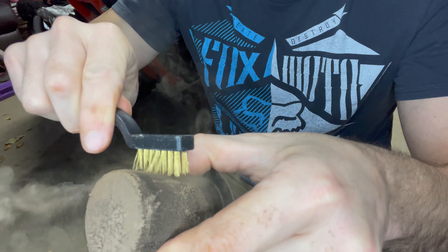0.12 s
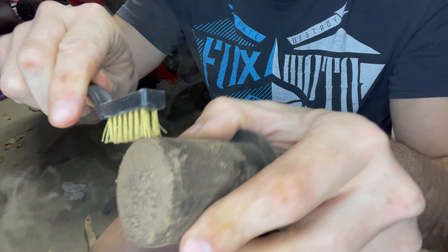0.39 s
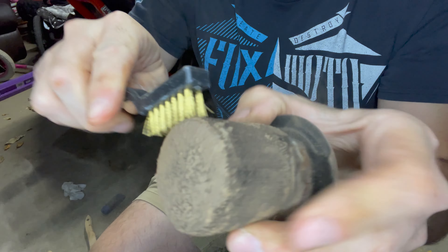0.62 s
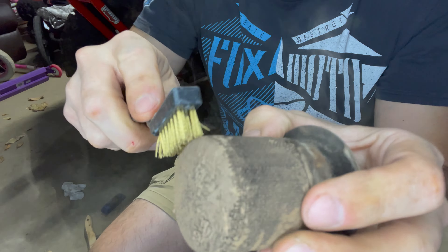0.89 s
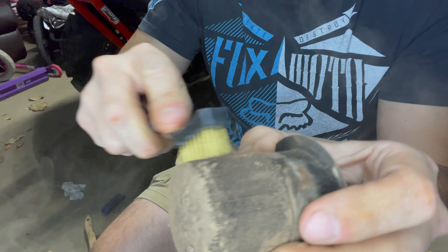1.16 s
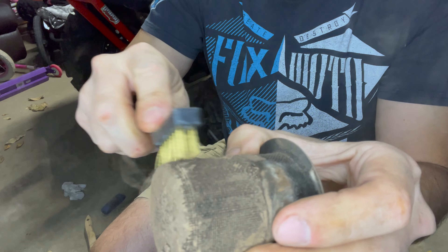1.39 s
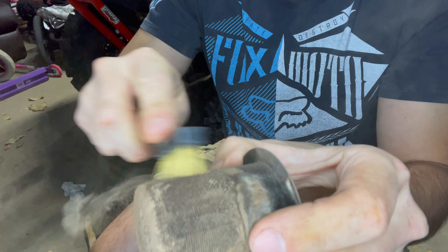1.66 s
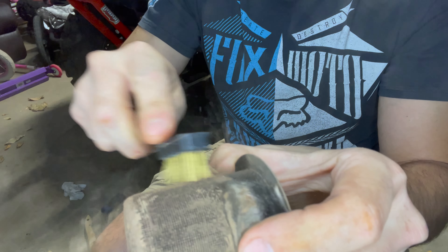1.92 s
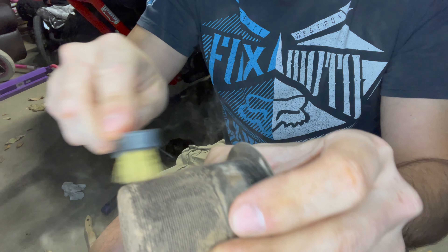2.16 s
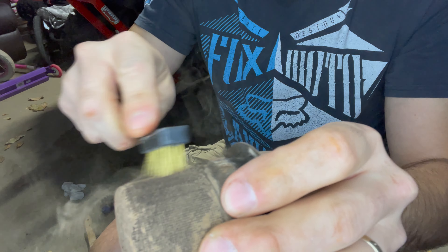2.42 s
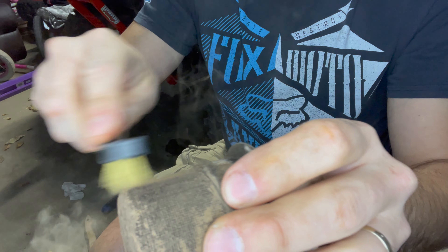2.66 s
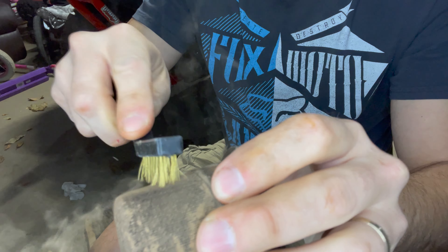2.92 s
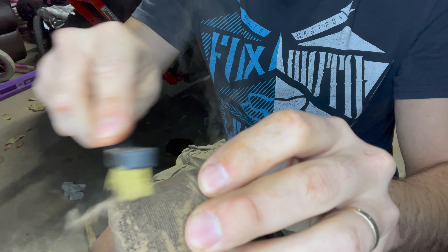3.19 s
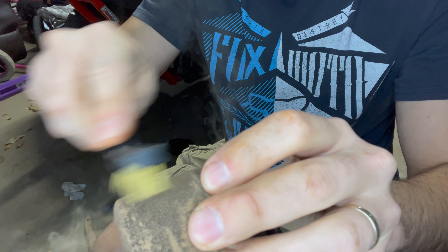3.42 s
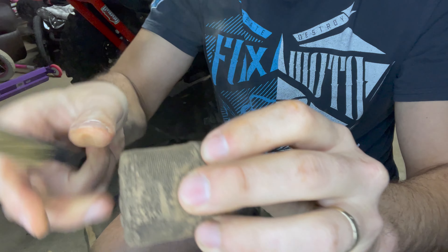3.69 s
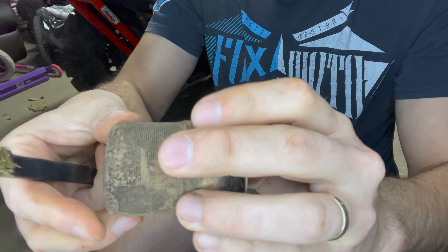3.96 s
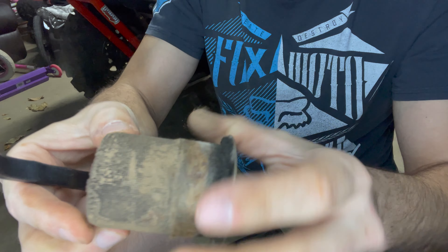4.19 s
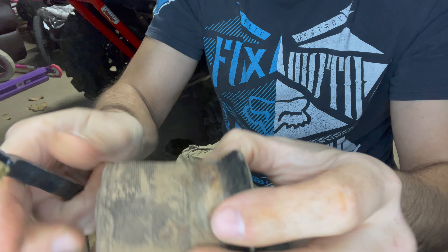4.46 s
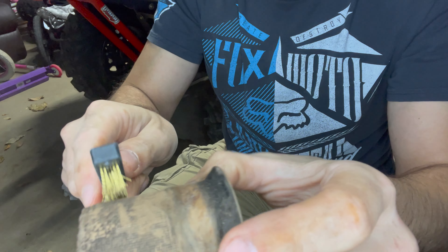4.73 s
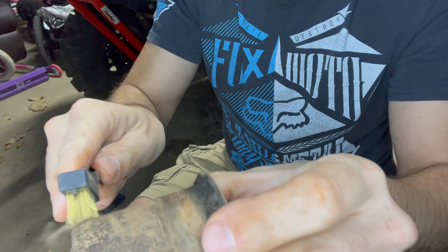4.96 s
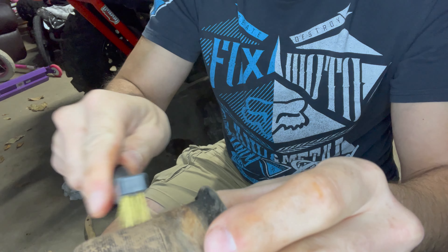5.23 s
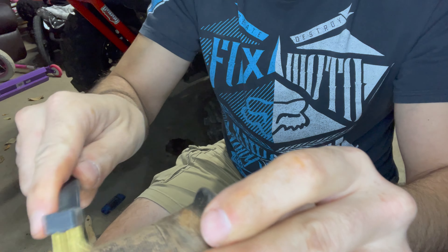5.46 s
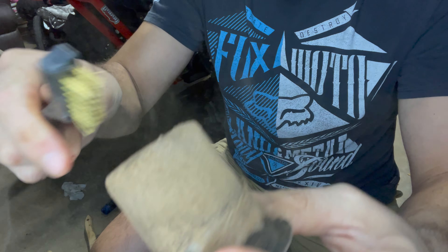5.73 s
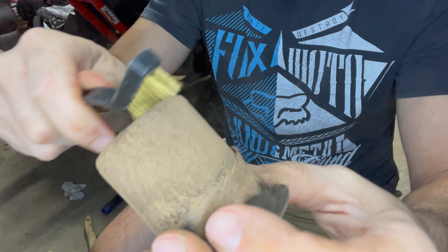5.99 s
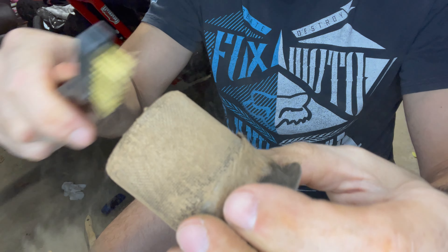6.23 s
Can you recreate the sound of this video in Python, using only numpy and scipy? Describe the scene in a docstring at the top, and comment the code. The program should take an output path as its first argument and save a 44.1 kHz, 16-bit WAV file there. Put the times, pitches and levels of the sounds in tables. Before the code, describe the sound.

Close, dry bristle scratching on a dirty metal cup comes in fast back-and-forth bursts, with quiet gritty turning between and a distant engine drone.

```python
"""Wire brush on a crusted mesh cup

A small wire brush scrubs a metal mesh cup back and forth, close to a two-port microphone in a garage.
Showers of random bristle slips make the scratch and ring the cup's modes; brief noise ticks sharpen it.
Between the bursts fingers turn the cup: soft rubs, slides and knocks, with grit cracking in tiny bursts.
A distant engine drones as a stack of sine orders, over low street rumble of coloured noise."""
import sys
import numpy as np
from scipy import signal
from scipy.fft import rfft, irfft
from scipy.io import wavfile
from scipy.ndimage import uniform_filter1d

SR = 44100
rng = np.random.default_rng(int(sys.argv[2]) if len(sys.argv) > 2 else 0)


def field_ratio(decibels):
    """Amplitude ratio for a level in dB (20 dB per decade); scalars and array-likes work."""
    return 10 ** (np.asarray(decibels, dtype=float) / 20)


def put_to_file(sound):
    """Save the sound as 16-bit audio at rate SR, in the file named by the first command-line argument."""
    columns = np.atleast_2d(sound).T  # one column per channel
    safe = np.clip(columns, -1, 1)
    whole_steps = np.round(safe * 32767)
    wavfile.write(sys.argv[1], SR, whole_steps.astype(np.int16))


N = 280715

# brush strokes; each time runs between full speed and 6 dB down; pressure is into the wall:
# full_speed_s, level_db, speed_up_ms, slow_down_ms, pressure_db
STROKES = [(0.036, -37.5, 24, 26, 0), (0.119, -35.5, 19.6, 18.6, 2.5), (0.197, -38, 19.5, 25, 1),
           (0.304, -40.5, 13, 2.8, -4), (1.08, -35.5, 6, 44, 3.5), (1.209, -40, 31, 32, 2.5),
           (1.32, -50.5, 42, 3.6, 4), (1.424, -39.5, 18.7, 58, 7), (1.585, -40, 35.6, 18, 8),
           (1.68, -36, 31.6, 31, 6), (1.805, -41, 49, 12, 7.5), (1.889, -36, 27, 30, 5.5),
           (2.004, -42.5, 45, 12.5, 9), (2.094, -36, 30, 20.5, 6.5), (2.2, -36, 38, 5.4, -11),
           (2.27, -36, 30.3, 23, 3), (2.359, -34, 31, 17.6, -14.5), (2.433, -34, 26, 24, -9),
           (2.518, -34.5, 21, 24, -3), (2.604, -34, 32, 18.6, -9), (2.681, -28.5, 19.4, 15.6, -26),
           (2.77, -33.5, 28.4, 15.8, 0.5), (2.845, -32, 21, 15, -11), (2.928, -34, 35, 16, -4),
           (2.997, -32, 19.5, 19, -14), (3.083, -31, 29, 16.3, -7), (3.167, -31, 22.7, 15.4, -19),
           (3.241, -33, 29, 15.4, -4.5), (3.324, -34, 24.5, 13, -7), (3.394, -33, 31.4, 11.2, -1),
           (3.459, -29, 17.5, 12.4, -2), (4.847, -41.5, 43, 30, 7), (4.943, -37, 29, 18, -0.5),
           (5.035, -35, 32, 25, -1), (5.117, -35.5, 19, 16.3, -12.5), (5.213, -36, 32, 17, 0.5),
           (5.288, -35.5, 25.6, 21.7, -4), (5.389, -37.5, 42, 16, 3.5), (5.46, -38, 27, 20.4, 2),
           (5.546, -36, 23.6, 18.5, 6), (5.629, -38, 32, 18, 0), (5.698, -36, 13, 10, 3),
           (6.094, -36, 54, 24.4, 20.5), (6.375, -36.5, 34, 61, 19.5)]
# bristle scratch: pitch_hz, density_db (per Hz, relative)
SCRATCH_SPECTRUM = [(500, -19), (2400, -11.5), (3800, -7), (5200, -2), (7900, -1.5), (8600, -0.5),
                    (10700, 5), (13400, 0), (14800, 1), (16000, -0.5)]
# where the brush works along the cup: time_s, place (0 rim to 1 base)
BRUSH_PLACE = [(0, .03), (.4, 0.03), (1.1, 0.26), (1.6, 0.43), (2.1, 0.36), (2.7, 0.33), (3.45, 0.23),
               (4.8, 0.75), (5.3, 0.45), (5.7, 0.39), (6.05, 0.8), (6.37, 0.91)]
# ringing modes of the cup: pitch_hz, width_hz (at least), level_db (relative)
CUP_MODES = [(1055, 87, -7.5), (1272, 132, -3.5), (1500, 250, -11.5), (1697, 150, -5), (1955, 510, -10),
             (2210, 210, -37), (2941, 200, -8.5), (3330, 190, -8), (4330, 210, -25), (4680, 300, -12.5),
             (5600, 450, -8), (5130, 1100, -3)]
# how each mode answers along the cup: liveliest_place (0-1), level_there_db, reach (0-1)
MODE_SHAPES = [(0.035, 8.5, 0.62), (0.53, 6, 0.23), (0.45, -5, 0.63), (0.4, 2.5, 0.75), (0.53, 0.5, 0.81),
               (0.79, -15.5, 0.27), (0.45, 1.5, 0.84), (.8, 1, 0.38), (0.72, -2, 0.22), (0.93, 6, 0.54),
               (0.4, 0, 0.47), (0.87, 0, 0.11)]
CUP_DB = -24  # drive of the cup relative to the stroke level
DULLING = 0.31  # treble tilt lost per dB of pressure
GRIP_BEND = 0.018  # rms share by which the grip bends each mode
MAX_SHARPNESS = 14  # sharpest ratio of pitch to width that the crust allows

# light rubs of resting bristles and fingers; each time runs between the top and 6 dB down:
# top_s, level_db, rise_ms, fall_ms
RUBS = [(.25, -48.5, 48, 45), (0.384, -51, 110, 115), (0.521, -49, 9.9, 49), (.69, -50.5, 86, 54),
        (.83, -55, 44, 38.4), (.93, -53.5, 49, 11), (1.05, -48, 77, 12), (1.064, -40.5, 10.3, 12),
        (1.36, -54, 48, 170), (3.52, -57, 83, 34), (3.59, -72.5, 30, 27), (3.71, -74, 73, 65),
        (3.85, -64.5, 31, 60), (3.96, -71, 58, 51), (4.082, -60.5, 9.1, 24), (4.14, -86, 22, 25),
        (4.27, -84, 33, 25), (4.37, -64, 66, 58), (4.51, -70, 46, 43), (4.585, -63, 34, 38),
        (4.685, -51, 20, 56), (4.78, -50, 51, 37), (5.727, -36, 48, 3.8), (5.79, -70, 23, 16),
        (5.9, -82, 30, 49), (5.986, -46, 2.6, 54), (6.049, -43.5, 44, 89), (6.19, -64, 37, 26),
        (6.27, -79, 35, 52), (6.318, -38.5, 0.82, 23)]
# light rubbing: pitch_hz, density_db (per Hz, relative)
RUB_SPECTRUM = [(1500, -11), (2800, -5.5), (4200, -6.5), (6000, -7), (7000, -1), (7850, -5.5), (8600, -2.5),
                (10000, -6), (13600, -3), (16000, -2.5)]
# bristles trail on the crust around a stroke: dB, and multiples of the stroke's two lengths
DRAG_DB, DRAG_BEFORE, DRAG_AFTER = -11.5, 1.706, 2.39
WIRE_DB = -58  # rubs louder than this are mostly grainy wire, softer ones smooth skin

# brief noise ticks, many giving a stroke its sharp start: start_s, level_db (before colouring)
TICKS = [(0.271, -25), (0.305, -39), (1.056, -32), (1.075, -27), (1.2687, -48), (1.318, -33), (1.336, -51),
         (1.37, -35), (1.4187, -29), (1.5546, -19), (1.652, -35), (1.8443, -24), (1.9577, -39),
         (2.038, -39), (2.05, -25), (2.0692, -20), (2.1618, -33), (2.234, -40), (2.411, -34), (2.501, -23),
         (2.6656, -27.5), (2.751, -26), (2.828, -33), (2.9854, -20), (3.0667, -25), (3.144, -19),
         (3.301, -25), (3.3608, -31), (3.4404, -28), (3.643, -57), (4.6546, -47), (4.6853, -28.5),
         (4.6964, -32), (4.7292, -30.5), (4.744, -29), (4.7567, -33), (4.7664, -28), (5.1658, -26),
         (5.19, -18), (5.689, -23), (5.981, -47), (6.316, -40)]
# grit cracking under the fingers: start_s, level_db (before colouring)
GRIT = [(.3313, -39), (.3675, -34), (.376, -33), (.3925, -26), (.404, -28), (.446, -43), (.469, -38),
        (0.481, -30), (0.578, -41), (0.593, -44), (.6015, -35), (.6106, -30), (.621, -37), (0.6265, -27),
        (.6491, -28), (.6515, -33), (.660, -24), (.667, -33), (0.678, -39), (.684, -37), (.690, -37),
        (.701, -38), (.710, -39), (.7838, -46), (.8177, -49), (.8441, -29), (.8785, -29), (0.888, -45),
        (0.9088, -37), (0.967, -41), (3.606, -53), (3.6895, -47), (3.8342, -43), (4.601, -45),
        (4.0732, -48.5), (4.2802, -57), (4.347, -55), (4.4925, -53), (4.5027, -42), (4.5626, -58),
        (5.83, -65)]
# hollow knocks of the cup in the hand; width is for each of two passes:
# start_s, level_db, pitch_hz, width_hz, t60_s
KNOCKS = [(1.203, -40.5, 920, 220, 0.032), (3.696, -58, 2430, 1500, 0.025), (4.081, -64, 1800, 704, 0.076),
          (6.316, -45, 400, 400, 0.027)]
# skin sliding on the dusty crust; half length runs from the top to 8.1 dB down:
# top_s, level_db, half_length_ms, pitch_hz
SLIDES = [(.55, -80, 27, 7050), (1.04, -55, 33, 7460), (3.66, -77, 18, 6560), (3.75, -80, 12, 9050),
          (3.99, -78, 16, 8150), (4.085, -67.5, 16, 7000), (4.315, -68.5, 44, 7300),
          (4.38, -78.5, 66, 5700), (5.79, -75, 23, 7650)]

# how the two ports hear the cup: pitch_hz, likeness (0-1), left_over_right_db, right_lead_rad
PORTS = [(400, 0.96, -2, 0.3), (940, 0.33, -2.5, 2.5), (1370, 0.23, -2.5, 1.5), (1800, 0.44, -6, 0.86),
         (2480, 0.62, -1.5, 3), (2510, 1, 0, 3), (2900, 0.81, -6, 3), (3380, 0.74, -5, 1.03),
         (3940, 0.45, -1.5, 3), (4600, 0.37, -6, 1.5), (5300, .4, -6, 0), (6350, 0.15, -0.5, 0)]
SWAY = 0.74  # rms radians by which the moving hands shift the phase between the ports

# distant engine: time_s, level_db (of order 6), brightness_db_per_order
ENGINE = [(0, -82, -3), (0.391, -86, 5), (.6, -90, 3.5), (.95, -85, 3.5), (1.3, -87, 2.5), (1.75, -77, 3),
          (2.4, -67.5, -0.5), (3, -72.5, -0.5), (3.3, -74.5, 0.5), (3.6, -82, -3.5), (4.1, -77.5, 0.5),
          (4.36, -89, -1), (4.55, -68, -1), (4.8, -77.5, -3), (5.6, -83, -1.5), (5.9, -72.5, -4.5),
          (6.1, -73, -0.5), (6.37, -73, -3)]
# orders of the shaft: multiple (of the shaft rate), level_db (relative), left_right_phase_rad
ORDERS = [(4, 3.5, 1.5), (6, 3, 0.32), (7.5, -5, 0.4), (8, 2.5, 2), (9, 3.5, 1.1), (10, -9, 1.5)]
# shaft speed: time_s, turns_per_s
SHAFT = [(0, 42.9), (3, 44.8), (3.5, 44.2), (4.6, 44), (6.37, 42.8)]
# the second order booms on its own: time_s, level_db
SECOND_ORDER_LEVEL = [(0, -65), (.4, -58), (1.3, -57), (1.9, -54.5), (2.5, -68), (3.1, -60), (3.6, -58.5),
                      (4.2, -50.5), (4.36, -68), (4.6, -79), (4.9, -57), (5.4, -65.5), (6.37, -63)]
# steadier hum: time_s, level_db
HUM_LEVEL = [(0, -58.5), (1.2, -57), (4.2, -65.5), (5.2, -58), (6.37, -63.5)]
HUM_HZ = 124.5

# street rumble and room air: pitch_hz, density_db (per Hz, relative)
RUMBLE_SPECTRUM = [(15, -42.5), (30, -0.5), (50, -1.5), (85, 1), (125, -6.5), (160, -12.5), (256, -17),
                   (309, -24), (575, -28.5), (936, -18.5), (1400, -29.5), (2480, -45.5), (3300, -51.5),
                   (4800, -54), (7500, -55), (16000, -59)]
# swell of the rumble: time_s, level_db
RUMBLE_LEVEL = [(0, -52.5), (.5, -51.5), (1.8, -50), (2.6, -51), (3.7, -50.5), (4.2, -54), (4.33, -54),
                (4.5, -52.5), (4.9, -56.5), (5.3, -54.5), (6.37, -53)]
# left-right likeness of the rumble: pitch_hz, likeness (-1 to 1)
RUMBLE_LIKENESS = [(60, 0.88), (150, 0.75), (380, -0.088), (950, -0.37), (2380, -0.17), (5980, 0.87),
                   (15000, -0.07)]
# the lowest part swells on its own: time_s, level_db
DEEP_LEVEL = [(0, -56), (3, -69), (4.3, -58), (6.37, -54)]

BAND_LOW_HZ, BAND_HIGH_HZ = 38, 15800
MERGE_HZ = 6600  # the channels become nearly one signal above this
HIGH_LAG = 6  # samples by which right trails left above the merge, on average
PHASE_FLATTENING = 0.3  # how far the phase between the channels flattens towards 0 and pi


def evened(x):
    """Scales to rms 1."""
    return x / np.sqrt(np.mean(x ** 2) + 1e-20)


def read(points, hz, axis=1):
    """Reads one column of a table on a log-frequency axis."""
    columns = np.transpose(points)
    return np.interp(np.log(hz + 1), np.log(columns[0] + 1), columns[axis])


def over_time(points):
    """Draws the second column of a table as a curve over the whole scene."""
    return np.interp(np.arange(N) / SR, *np.transpose(points))


def colour(x, points):
    """Filters by a spectrum in dB."""
    return irfft(rfft(x) * field_ratio(read(points, np.fft.rfftfreq(N, 1 / SR))), N)


def wander(size):
    """Smooth random drift of rms 1 that changes over size samples."""
    return evened(uniform_filter1d(uniform_filter1d(rng.standard_normal(N), size), size))


def mode(x, hz, width):
    """A steep resonance of rms 1: the same peak filter run twice."""
    b, a = signal.iirpeak(hz, hz / width, SR)
    once = signal.lfilter(b, a, x)
    return evened(signal.lfilter(b, a, once))


def swell(s, rise_ms, fall_ms, rise_power, fall_power):
    """Samples around s and their level in dB, falling away on each side of the top."""
    near = np.arange(max(round((s - 0.25) * SR), 0), min(round((s + 0.24) * SR), N))
    t = near / SR
    off = np.where(t < s, (s - t) / rise_ms, (t - s) / fall_ms) * 1e3
    return near, -6 * off ** np.where(t < s, rise_power, fall_power)


def brush():
    """Each stroke swells with brush speed; slips give the scratch and shake the cup."""
    low, high, cup = np.zeros((3, N))
    for s, db, up_ms, down_ms, press_db in STROKES:
        # bristles bite suddenly, then ease off
        near, speed_db = swell(s, up_ms, down_ms, 3.45, 2.04)
        tilt_db = DULLING * press_db / 2
        low[near] += field_ratio(db + tilt_db + speed_db)
        high[near] += field_ratio(db - tilt_db + speed_db)
        # the cup answers over a longer part of the stroke
        cup[near] += field_ratio(db + CUP_DB + press_db + 0.85 * speed_db)
    drive = slips(per_s=20000, spread_db=1.5, clump_db=1.0, patchy_db=3.0)
    scratch = evened(colour(drive, SCRATCH_SPECTRUM))
    dull = colour(scratch, [(7000, 0.9), (11000, -2.0)])
    scrape = low * dull + high * (scratch - dull)
    return field_ratio(1.0) * scrape + cup * ring(drive)


def slips(per_s, spread_db, clump_db, patchy_db):
    """Two unrelated showers of tiny slips, uneven in size, in shared clumps and drifting patches of pitch."""
    fired = rng.random((2, N)) < per_s / SR
    size_db = spread_db * np.minimum(rng.exponential(1, (2, N)), 3)
    size = field_ratio(size_db) * rng.standard_normal((2, N))
    clumps = field_ratio(clump_db * wander(size=90))
    z = signal.stft(fired * size * clumps, nperseg=128)[2]
    patches = rng.standard_normal(z.shape[:0:-1]).T  # bins by frames, shared by both showers
    patches = uniform_filter1d(uniform_filter1d(patches, size=3, axis=0), size=12, axis=1)
    return evened(signal.istft(z * field_ratio(patchy_db * evened(patches)), nperseg=128)[1][:, :N])


def ring(x):
    """Slips drive the cup's modes; balance follows the place and wavers, pitch drifts with the grip."""
    place = over_time(BRUSH_PLACE)
    out = np.zeros_like(x)
    for k, ((hz, width, db), (best, best_db, reach)) in enumerate(zip(CUP_MODES, MODE_SHAPES)):
        here_db = best_db - 18 * np.tanh(((place - best) / reach) ** 2)
        waver_db = 1.7 * wander(size=1500)
        bent_turns = hz * np.cumsum(1 + GRIP_BEND * wander(size=3000)) / SR
        turn = np.exp(2j * np.pi * bent_turns)
        r = np.exp(-np.pi * max(width, hz / MAX_SHARPNESS) / SR)
        # shift the mode down to 0 Hz, smooth there, shift back up
        around_zero = signal.lfilter([1], [1, -2 * r, r * r], x / turn)
        rung = evened((turn * around_zero).real)
        # alternating signs: neighbours add up between peaks
        out += (-1) ** k * field_ratio(db + here_db + waver_db) * rung
    return out


def rubbing():
    """Slips under light pressure, grainy wire or smooth skin: the drag around each stroke and separate rubs."""
    level = np.zeros(N)
    for s, db, up_ms, down_ms, _ in STROKES:
        near, drag_db = swell(s, DRAG_BEFORE * up_ms, DRAG_AFTER * down_ms, 11.0, 12.0)
        level[near] = np.maximum(level[near], field_ratio(db + DRAG_DB + drag_db))
    for s, db, rise_ms, fall_ms in RUBS:
        near, touch_db = swell(s, rise_ms, fall_ms, 2.76, 3.1)
        level[near] = np.hypot(level[near], field_ratio(db + touch_db))
    wire = 1 / (1 + (field_ratio(WIRE_DB) / (level + 1e-9)) ** 4)  # power share of the grainy slips
    grainy = slips(per_s=6000, spread_db=2.0, clump_db=2.0, patchy_db=1.0)
    smooth = slips(per_s=23000, spread_db=0.0, clump_db=1.6, patchy_db=3.0)
    drive = np.sqrt(wire) * grainy + np.sqrt(1 - wire) * smooth
    rub = evened(colour(drive, RUB_SPECTRUM))
    return level * (field_ratio(-3.0) * rub + field_ratio(-21.5) * ring(drive))


def ticks():
    """Brief decaying noise ticks, many giving a stroke its sharp start, and shorter, brighter cracks of grit."""
    sharp = colour(bursts(TICKS, t60=0.019), SCRATCH_SPECTRUM)
    cracks = colour(bursts(GRIT, t60=0.008), [(2500, -9), (8000, -4.0)])
    return sharp + colour(cracks, SCRATCH_SPECTRUM)


def bursts(table, t60):
    """Separate noise at each port, rising in half a millisecond and decaying by 60 dB in t60 seconds."""
    t = np.arange(300) / SR
    out = np.zeros((2, N + 300))
    shape = field_ratio(-60 * t / t60) * np.minimum(t / 0.0005, 1)
    for s, db in table:
        noise = rng.standard_normal((2, 300))
        burst = np.array([evened(shape * side) for side in noise]) * np.std(shape)
        out[:, round(s * SR):][:, :300] += field_ratio(db - 3.0) * burst
    return out[:, :N]


def knocks():
    """Short puffs of noise through a damped resonance."""
    t = np.arange(4000) / SR
    out = np.zeros((2, N + 4000))
    for s, db, hz, width, t60 in KNOCKS:
        fade = field_ratio(db - 60 * t / t60) * (1 - np.exp(-t / 0.00074))
        puff = rng.standard_normal((2, 4000))
        out[:, round(s * SR):][:, :4000] += fade * mode(puff, hz, width)
    return out[:, :N]


def slides():
    """Sliding skin: soft noise in one high resonance, swelling and fading."""
    t = np.arange(N) / SR
    noise = rng.standard_normal((2, N))
    out = np.zeros((2, N))
    for s, db, ms, hz in SLIDES:
        off = (t - s) / ms * 1e3
        out += field_ratio(db - 8.1 * off ** 2) * mode(noise, hz, width=900.0)
    return out


def ports(pair):
    """The right port hears a partly different copy of the left; around 2.7 kHz the two oppose each other."""
    hz, _, (left, other) = signal.stft(pair, SR, nperseg=512)
    same = np.clip(read(PORTS, hz), 0, 1)[:, None]
    tilt = field_ratio(read(PORTS, hz, axis=2) / 2)[:, None]
    lead = read(PORTS, hz, axis=3)[:, None]
    sway = rng.standard_normal(left.shape[::-1]).T
    sway = evened(uniform_filter1d(uniform_filter1d(sway, size=9, axis=0), size=14, axis=1))
    shared = same * left * np.exp(1j * (lead + SWAY * sway))
    right = shared + np.sqrt(1 - same ** 2) * other
    return signal.istft(np.array([left * tilt, right / tilt]), nperseg=512)[1][:, :N]


def garage(x):
    """A faint short tail from walls and shelves: decaying noise convolved with the sound."""
    t = np.arange(SR // 2) / SR
    tail = rng.standard_normal((2, len(t))) * field_ratio(-60 * t / 0.38) * (t > 0.004)
    tail = signal.lfilter([1], [1, -0.5], tail)  # darker than the direct sound
    return field_ratio(-28.0) * signal.fftconvolve(x, tail / np.linalg.norm(tail[0]), axes=1)[:, :N]


def drone():
    """Shaft orders of a distant engine, each fading on its own, and a steadier hum, all as wavering sines."""
    t = np.arange(N) / SR
    s, db, bright_db = np.transpose(ENGINE)
    turns = 2 * np.pi * np.cumsum(over_time(SHAFT)) / SR
    side = np.array([[0.5], [-0.5]])  # splits each phase difference between left and right
    hum_db = over_time(HUM_LEVEL) + 2.6 * wander(size=6000)
    out = field_ratio(hum_db) * np.sin(2 * np.pi * HUM_HZ * t + 0.73 * wander(size=4000) + 0.82 * side)
    second_db = over_time(SECOND_ORDER_LEVEL) + 2.7 * wander(size=4000)
    out += field_ratio(second_db) * np.sin(2 * turns + 0.46 * wander(size=4000) + 0.14 * side)
    for k, order_db, phase in ORDERS:
        fade_db = np.interp(t, s, db + bright_db * (k - 6)) + order_db + 3 * wander(size=5000)
        out += field_ratio(fade_db) * np.sin(k * turns + 1.3 * wander(size=3000) + phase * side)
    return np.sqrt(2) * out  # so that the levels are rms


def rumble():
    """Low traffic wash of coloured noise, much alike at both ports in the bass, over one deep resonance."""
    same = np.clip(read(RUMBLE_LIKENESS, np.fft.rfftfreq(N, 1 / SR)), -1, 1)
    a, b = rfft(rng.standard_normal((2, N)))
    pair = irfft(np.array([a, same * a + np.sqrt(1 - same ** 2) * b]), N)
    wash = evened(colour(pair, RUMBLE_SPECTRUM))
    wash_db = over_time(RUMBLE_LEVEL) + 1.8 * wander(size=5000)
    deep = field_ratio(over_time(DEEP_LEVEL)) * mode(rng.standard_normal(N), hz=53.8, width=26.6)
    balance = field_ratio(np.array([[-1.0], [1.5]]))  # left, right
    return balance * (field_ratio(wash_db) * wash + deep)


def scene():
    """Hands and cup at the ports, their room tail, and the street."""
    near = ports(brush() + rubbing() + ticks() + knocks() + slides())
    return near + garage(near) + drone() + rumble()


def top_cut(x):
    """Nothing passes above the cut-off."""
    return signal.sosfilt(signal.butter(12, 16840, fs=SR, output="sos"), x)


def record(dry):
    """Above the merge both channels carry nearly one signal, the right a few samples late; band limits."""
    hz = np.fft.rfftfreq(N, 1 / SR)
    lag = 2 * np.pi * hz * HIGH_LAG / SR
    # less alike where the phase between the channels is midway between 0 and pi
    merged = (1 - 0.28 * np.sin(lag) ** 4) / (1 + (MERGE_HZ / (hz + 1)) ** 16)
    # the phase between the channels, flattened towards 0 and pi
    flattened = lag - PHASE_FLATTENING * np.sin(2 * lag) + 0.014 * np.sin(4 * lag)
    left, right = rfft(dry)
    late = left * np.exp(-1j * flattened)
    both = np.array([left, np.sqrt(1 - merged) * right + np.sqrt(merged) * late])
    both /= (1 + (BAND_LOW_HZ / (hz + 1)) ** 4) * (1 + (hz / BAND_HIGH_HZ) ** 400)
    return top_cut(irfft(both, N))


dry = scene()
out = record(dry)
put_to_file(out)
```